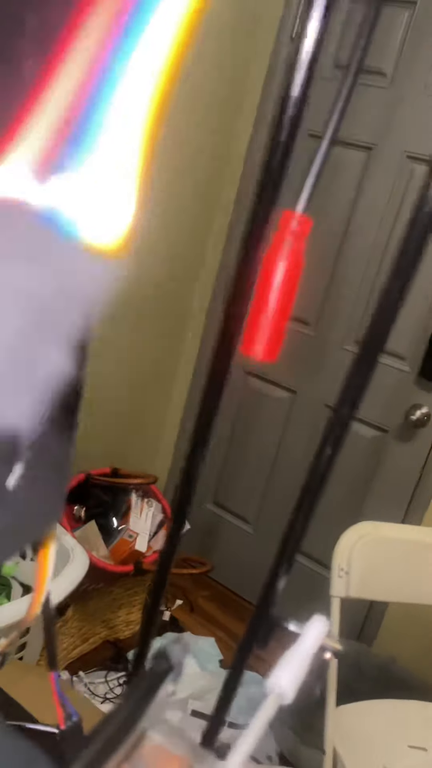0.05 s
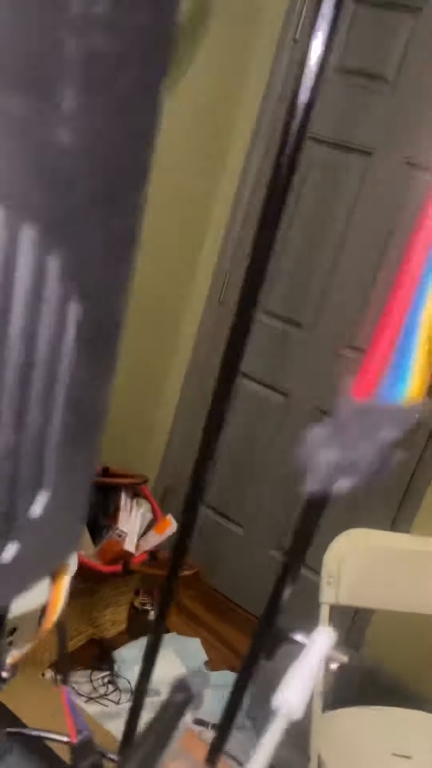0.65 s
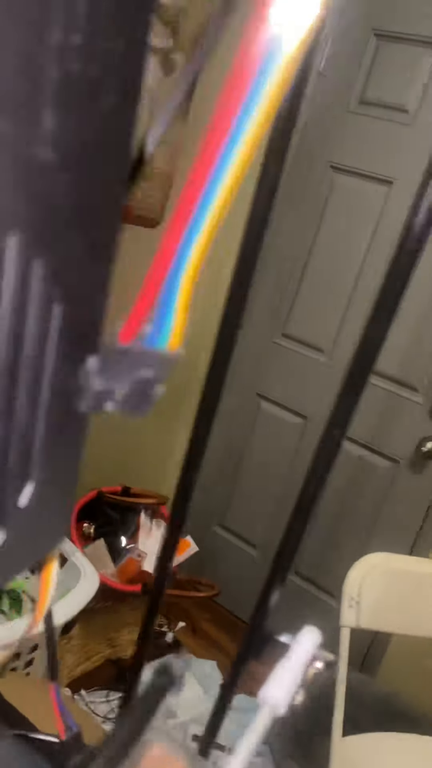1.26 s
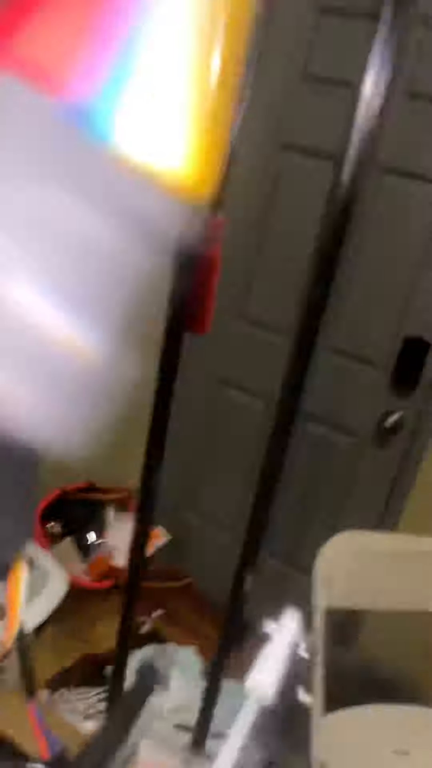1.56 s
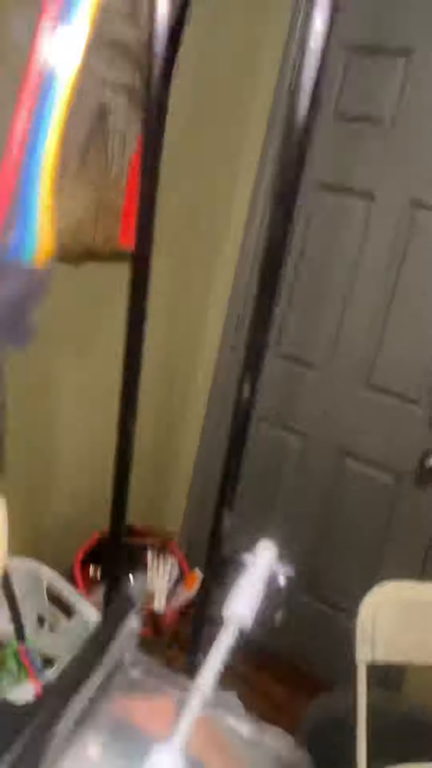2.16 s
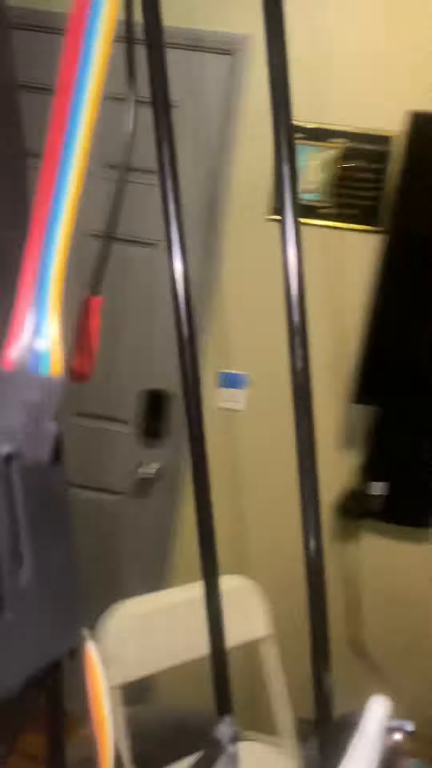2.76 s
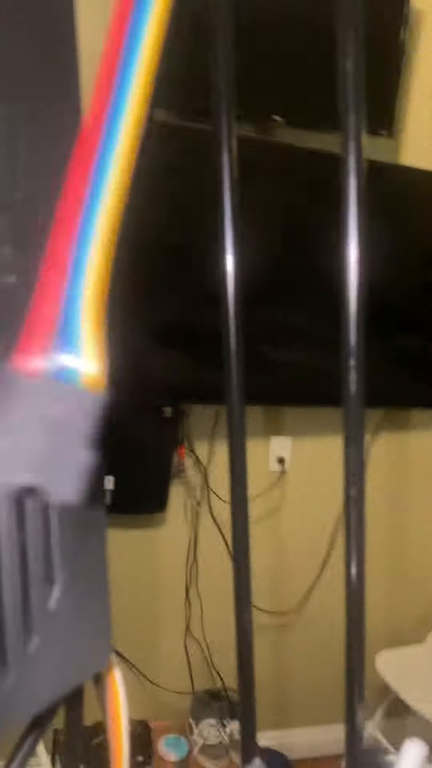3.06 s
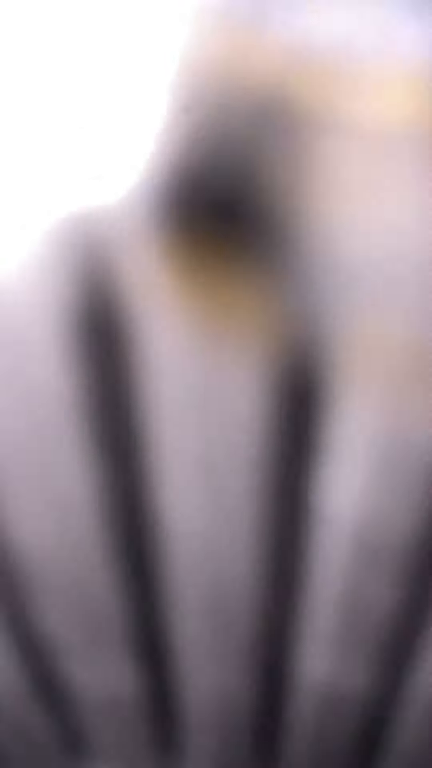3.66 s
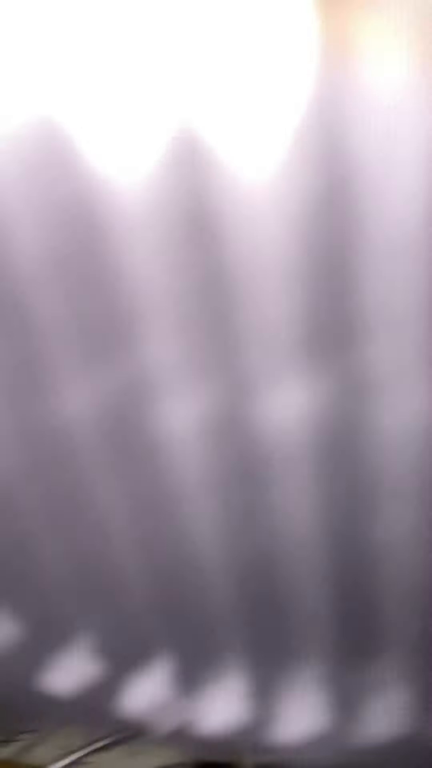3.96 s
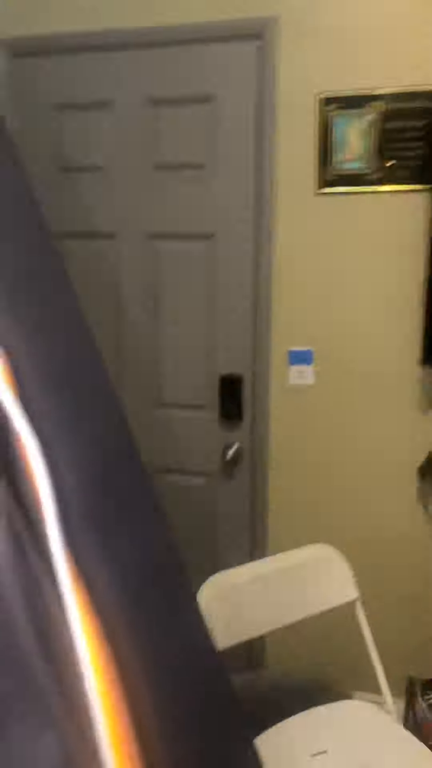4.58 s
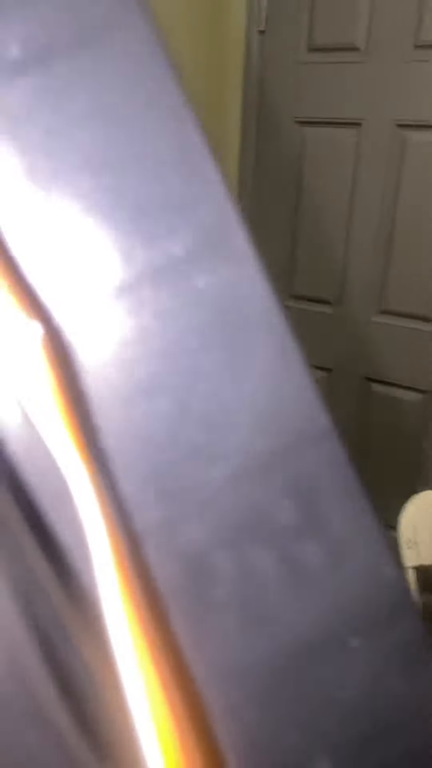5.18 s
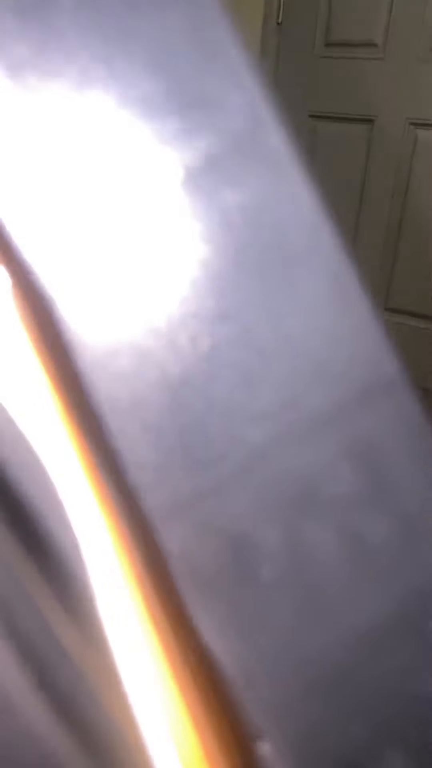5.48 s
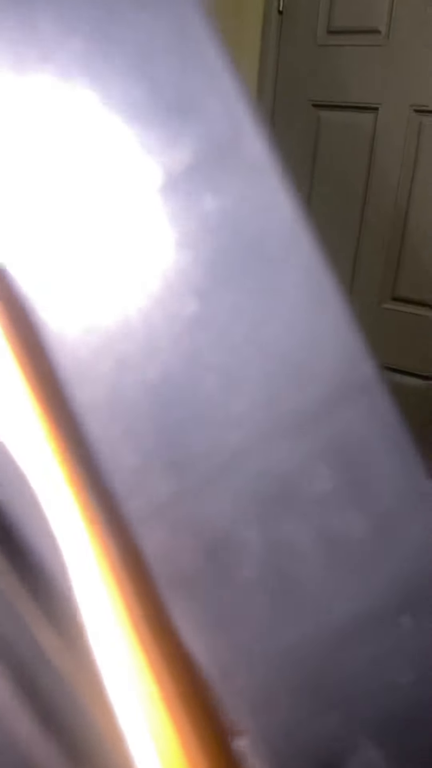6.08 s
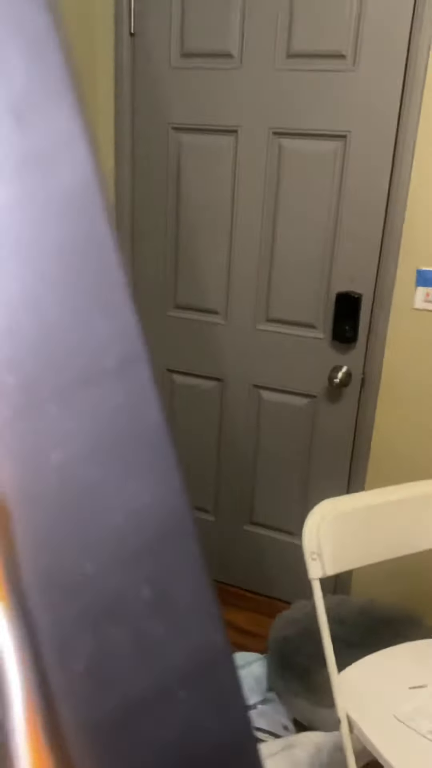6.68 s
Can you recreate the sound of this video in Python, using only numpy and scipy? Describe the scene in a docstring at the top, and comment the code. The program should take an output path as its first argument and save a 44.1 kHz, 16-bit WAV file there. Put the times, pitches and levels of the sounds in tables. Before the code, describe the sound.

Metal poles knock, scrape and clink amid rustling fabric in a small room, with heavy thumps on the microphone midway.

```python
"""Cloth rustles and metal poles knock, scrape and clink as someone shifts a fabric-covered frame
in a small room, right next to a phone; heavy bumps on its microphone thump and boom. Each impact
excites damped resonances of the tubes, the frame and the room, stick-slip friction drives the
scrapes, and the rustle is the sum of many tiny slips of fabric. The walls add a short tail."""
import sys
import numpy as np
from scipy import signal
from scipy.fft import rfft, irfft, next_fast_len
from scipy.io import wavfile

SR = 44100
rng = np.random.default_rng(int(sys.argv[2]) if len(sys.argv) > 2 else 0)


def unload_wav(signal):
    """Save mono or channel-first audio to the path in sys.argv[1] as 16-bit WAV at rate SR, clipped to [-1, 1]."""
    wavfile.write(
        sys.argv[1],
        SR,
        np.round(np.clip(np.atleast_2d(signal).T, -1, 1) * 32767).astype(np.int16),
    )


N = 305749

# pole impacts, each with two hollow resonances:
# start_s, level_db, hardness_db, lower_hz, upper_hz, t60_s, tilt_db_per_octave
KNOCKS = [(0.249, -47, -6.5, 747, 1537, 0.088, 2.5), (0.393, -40, -2.5, 919, 3340, 0.13, -12),
          (0.543, -29, 4.5, 900, 1500, 0.05, -15), (0.858, -45, -4.5, 770, 1470, .08, -0.5),
          (.982, -33.5, -14.5, 787, 900, 0.06, 0), (1.035, -42, 7.5, 790, 2960, 0.083, 11),
          (1.182, -29, 0, 900, 1646, 0.046, -11), (1.353, -16.5, 0, 924, 2054, 0.059, -1.5),
          (1.442, -19.5, 3, 893, 2078, 0.089, 2), (1.68, -28.5, -12, 800, 886, 0.048, -2),
          (1.743, -28.5, 9, 1897, 2277, .065, 1), (2.128, -38.5, 1.5, 1810, 2706, 0.075, 2.5),
          (2.248, -38, -9.5, 800, 900, 0.042, -9), (2.491, -48.5, 1.5, 906, 1930, 0.063, -11),
          (2.593, -45, 15, 1625, 2700, 0.049, 5), (2.754, -47.5, -0.5, 1390, 2950, 0.048, 11),
          (2.803, -41.5, 19, 1900, 3000, .065, -2), (2.865, -38.5, 0, 805, 1687, 0.1, -18),
          (3.255, -47.5, 9.5, 1500, 1890, 0.11, -4), (3.561, -39, 7.5, 1500, 1870, 0.036, 1.5),
          (3.606, -18, -1, 990, 1320, 0.035, -5.5), (3.999, -41, -3, 1156, 1300, 0.046, 11.5),
          (4.158, -36, 7, 1123, 3635, 0.12, 8.5), (4.492, -44.5, 0.5, 1480, 2785, 0.05, 0),
          (4.55, -44.5, 19.5, 900, 1804, 0.052, 4), (5.037, -33.5, 0.5, 1047, 2300, 0.1, 2),
          (5.174, -49, 1, 855, 2300, 0.06, -10), (5.609, -30, -8.5, 900, 1423, .06, -6),
          (6.775, -29, -7.5, 900, 2900, 0.065, 13)]
# spectrum of a contact: frequency_hz, density_db
CONTACT_SPECTRUM = [(25, -30), (55, -0.5), (120, 4), (220, -4), (330, -0.5), (520, -3), (700, -3.5),
                    (1200, 2.5), (2400, -2), (4000, -7), (6000, -16), (9000, -37), (12000, -65.5)]
# the thud, body, crack and tick bands: low_hz, high_hz
BANDS = [(35, 200), (200, 700), (700, 2800), (2800, 11000)]
# stereo width and reverberation of each band: side_db, room_db, room_t60_s
BAND_SPACE = [(-12, -12, 1), (-10, -9.5, 0.3), (-5, -7.5, 0.14), (-0.5, -9, 0.26)]
# the shifting grip decides where the frame sounds strongest: time_s, centre_hz
GRIP = [(0, 407), (3.3, 439), (4.0, 291), (5.05, 512), (5.6, 375), (6.8, 330)]


def undb(db):
    """Decibels to amplitude ratio."""
    return 10 ** (np.asarray(db) / 20)


def unit(x):
    """Normalise to rms 1."""
    return x / np.sqrt(np.mean(x ** 2))


def clock(seconds):
    """Time axis in seconds."""
    return np.arange(int(seconds * SR)) / SR


def fade(t, t60):
    """Exponential decay of 60 dB in t60 seconds."""
    return np.exp(-np.log(1000) * t / t60)


def onset(t, rise_s):
    """Exponential approach to full amplitude."""
    return 1 - np.exp(-t / rise_s)


def peak(hz, centre_hz, octaves):
    """Resonance peak of height 1, Gaussian in log frequency."""
    return np.exp(-(np.log2(hz / centre_hz) / octaves) ** 2)


def add(out, start_s, x):
    """Superpose a sound at a given time."""
    i = max(int(start_s * SR), 0)
    out[:, i:i + x.shape[1]] += x[:, :N - i]


def band(x, edges_hz, order=3):
    """Causal band-pass filter."""
    return signal.sosfilt(signal.butter(order, edges_hz, "band", fs=SR, output="sos"), x)


def spectrum_db(points, at_hz):
    """Interpolate (frequency_hz, density_db) points over log frequency."""
    hz, db = np.transpose(points)
    return np.interp(np.log(at_hz), np.log(hz), db)


def noise(points, size):
    """White noise shaped to a spectrum; rms 1."""
    n = next_fast_len(size)
    hz = np.maximum(np.fft.rfftfreq(n, 1 / SR), 1)
    shaped = rfft(rng.standard_normal(n)) * undb(spectrum_db(points, hz))
    return unit(irfft(shaped, n)[:size])


def ring(modes, t, detune=0.0065):
    """Modal superposition: damped sines, randomly retuned for each blow."""
    chance = rng.standard_normal((len(modes), 2))
    return sum(undb(db) * fade(t, t60) * np.sin(2 * np.pi * (hz * (1 + detune * shift) * t + phase))
               for (hz, db, t60), (shift, phase) in zip(modes, chance))


def stereo(mid, side, side_db):
    """Left and right from two uncorrelated signals, conserving power."""
    width = undb(side_db)
    return np.array([mid + width * side, mid - width * side]) / np.sqrt(1 + width ** 2)


def focus(hz, centre_hz, hollow_hz):
    """The point of contact selects a low resonance and a hollow one; emphasis in dB."""
    return 6.0 * peak(hz, centre_hz, octaves=0.26) + 6.5 * peak(hz, hollow_hz, octaves=0.18)


def rattle(centre_hz, hollow_hz, size):
    """Modal overlap: countless weak resonances merge into coloured noise."""
    hz = np.geomspace(25, SR / 2, 160)
    return noise(np.c_[hz, spectrum_db(CONTACT_SPECTRUM, hz) + focus(hz, centre_hz, hollow_hz)], size)


def frame_and_room_ring(centre_hz, hollow_hz, t60, t):
    """Strong resonances of the frame and the small room, ringing after each contact."""
    # resonances of the frame and the room: frequency_hz, level_db, t60_ratio
    resonances = [(174, -13.5, 1.6), (291, -7.5, 2.1), (342.8, -7, 1.8), (374.3, -7.5, 1.3),
                  (418.3, -1.5, 1.7), (501, -2.5, 1.8), (551, -6, 1.6), (620.6, -9, 1.1), (818, -5, 1.3),
                  (924, 0, .9), (992, -7, .9), (1095, -10.5, 2.4), (1240, -8, .9), (1380, -2.5, 1.1),
                  (1625, -8.5, 1.4), (1810, -10.5, 1.0), (2177, -5.5, 1.1), (2660, -9, 1.1),
                  (2876, -10.5, 1.3), (3890, -13, 1.1)]
    damped_t60 = min(t60, .075)
    modes = [(hz, db + focus(hz, centre_hz, hollow_hz), damped_t60 * ratio)
             for hz, db, ratio in resonances]
    return ring(modes, t, detune=.016)


def hollow(hollow_hz, t60, t):
    """A hollow section clacks in a tight cluster of modes; a high cluster is damped faster."""
    cluster = [(.89, -7), (.95, -2), (1, 1), (1.05, -2), (1.12, -7)]  # frequency_ratio, level_db
    cluster_t60 = t60 * min(2300 / hollow_hz, 1)
    return ring([(hollow_hz * ratio, db, cluster_t60) for ratio, db in cluster], t)


def friction(slips, centre_hz, hollow_hz, slip_t60, ring_t60):
    """Impulse response: each slip releases a noise burst and rings frame, room and tube; rms 1."""
    t, size = clock(.2), len(slips)
    swell = onset(t, .0015)
    envelope = signal.fftconvolve(np.abs(slips), swell * fade(t, slip_t60))[:size]
    bursts = rattle(centre_hz, hollow_hz, size) * envelope
    modes = frame_and_room_ring(centre_hz, hollow_hz, ring_t60, t)
    modes += undb(1) * hollow(hollow_hz, ring_t60 / 2, t)
    hum = signal.fftconvolve(slips, swell * modes)[:size]
    return unit(unit(bursts) + unit(hum))


def crackle(rate_hz, spread_db, t60):
    """Shot-noise envelope: fibres and folds let go at random in overlapping, unequal grains."""
    t = clock(.05)
    sizes = undb(spread_db * np.minimum(rng.exponential(size=N), 4))
    grains = (rng.random(N) < rate_hz / SR) * sizes
    return signal.fftconvolve(grains, fade(t, t60) * onset(t, .002))[:N]


def contact_levels(db, hardness_db, share_db, cushioning=0.68):
    """Band levels in dB: a harder contact is shorter, so its energy lies higher in frequency."""
    # change in thud, body, crack and tick: db_per_hardness_db
    hardening = [-0.11, -0.48, 0.52, 0.53]
    cushion_db = np.array([0, 0, 0, cushioning * min(hardness_db, 0)])  # cloth absorbs the tick
    return db + np.array(share_db) + hardness_db * np.array(hardening) + cushion_db


def voice(pair, levels_db, window_s):
    """Spectral balance: set each band of a mid and side pair by its rms over the opening window."""
    out = 0
    for edges, db, (side_db, _, _) in zip(BANDS, levels_db, BAND_SPACE):
        part = band(pair, edges)
        rms = np.sqrt(np.mean(part[:, :int(window_s * SR)] ** 2, axis=1, keepdims=True))
        out = out + undb(db) * stereo(*(part / rms), side_db)
    return out


def still_air():
    """Ambient noise: the faint, steady, mostly low sound of the room's air."""
    # spectrum of the air: frequency_hz, density_db
    spectrum = [(25, -9.5), (100, 1), (400, -8), (1000, -28.5), (4000, -33), (8000, -39), (13000, -55.5)]
    return undb(-67.5) * stereo(noise(spectrum, N), noise(spectrum, N), side_db=-10.5)


def cloth_motion(t, shake_swish_db=-19, shake_crinkle_db=-25.5, settle_t60=0.3):
    """Incoherent powers add: the hands' pull plus each knock's shake, as swish and crinkle dB."""
    # cloth drawn along with the frame: time_s, swish_db, crinkle_db
    pulls = [(0, -54, -65), (0.801, -64, -66), (1.04, -41, -52), (1.27, -43.5, -53.5), (1.449, -32.5, -37),
             (1.72, -38.5, -54.5), (1.99, -59.5, -66.5), (2.085, -35.5, -44), (2.34, -49.5, -62.5),
             (3.071, -49, -61), (3.501, -57, -64), (3.78, -48.5, -60), (4.07, -47, -62), (4.36, -61, -80.5),
             (4.461, -47.5, -55), (4.61, -52.5, -56), (4.92, -75.5, -72.5), (5.13, -56.5, -53.5),
             (5.301, -70.5, -74), (5.67, -60, -77), (5.98, -80, -84.5), (6.27, -53.5, -74.5),
             (6.72, -62.5, -72.5), (6.93, -45, -55.5)]
    times, swish_db, crinkle_db = np.transpose(pulls)
    shake_power, after = np.zeros((1, N)), clock(.6)
    for start, db, *_ in KNOCKS:
        shake = undb(db) * onset(after, 0.022) * fade(after, settle_t60)
        add(shake_power, start, shake[None] ** 2)
    return [10 * np.log10(undb(np.interp(t, times, pull_db)) ** 2 + undb(shake_db) ** 2 * shake_power[0])
            for pull_db, shake_db in [(swish_db, shake_swish_db), (crinkle_db, shake_crinkle_db)]]


def flutter(t, depth_db=4.0, rate_hz=32.0):
    """Random amplitude modulation, in dB, as folds come and go."""
    steps = np.arange(0, t[-1] + 1, 1 / rate_hz)
    return depth_db * np.interp(t, steps, rng.standard_normal(len(steps)))


def swishing(t, slip_rate_hz=2200, grip_db=6.0):
    """Forced vibration: sliding folds drive low resonances, most of all near the grip's; rms 1."""
    # low resonances that sliding cloth excites: frequency_hz
    resonances = [304, 395, 540]
    sizes = undb(0.5 * np.minimum(rng.exponential(size=N), 5))
    slips = (rng.random(N) < slip_rate_hz / SR) * sizes * rng.choice([-1, 1], N)
    grip_hz, out = np.interp(t, *np.transpose(GRIP)), 0
    for hz in resonances:
        pair = np.array([friction(slips, hz, hollow_hz=800.0, slip_t60=0.0073, ring_t60=0.024)
                         for _ in range(2)])
        out = out + pair * undb(grip_db * peak(hz, grip_hz, octaves=0.36) + flutter(t))
    return unit(band(out, BANDS[1]) + undb(1) * band(out, BANDS[0]))


def cloth():
    """Friction noise of sliding folds: a structure-borne swish and a fine airborne crinkle."""
    t = np.arange(N) / SR
    swish_db, crinkle_db = cloth_motion(t)
    swish = swishing(t)
    grains = crackle(rate_hz=1500.0, spread_db=1.8, t60=.022)
    fibres = grains * np.array([noise(CONTACT_SPECTRUM, N) for _ in range(2)])
    crinkle = unit(band(fibres, (900, 7100), order=2))
    # broad and fine folds flutter independently, so the colour keeps shifting
    crinkle = unit(sum(band(crinkle, edges) * undb(flutter(t)) for edges in BANDS[2:]))
    return (stereo(*swish, side_db=-7.0) * undb(swish_db + flutter(t) / 2)
            + stereo(*crinkle, side_db=0.5) * undb(crinkle_db - 0.5 + flutter(t)))


def taps(t60=0.03, rise_s=0.002, gain_db=-1.5):
    """Heavy damping: light touches and buckling folds leave only a brief, hollow burst."""
    # taps and creases: start_s, relative_level_db, hardness_db, hollow_hz
    touches = [(0.02, -53, -11.5, 700), (0.123, -52, -13, 725), (0.329, -45, -12.5, 1020),
               (0.655, -52, -1, 1620), (1.169, -41.5, -1, 3400), (1.422, -37.5, 13, 5240),
               (2.374, -39.5, -8, 1390), (3.529, -25, -4.5, 1530), (3.574, -33.5, 15, 5600),
               (3.687, -40.5, 11, 4200), (3.693, -49, 12, 4400), (3.742, -55, 10, 4460),
               (3.968, -44, -8.5, 1240), (4.734, -50, 5, 1800), (4.943, -41, 9, 900),
               (4.999, -64.5, 18, 5000), (5.072, -47.5, 16.5, 3900), (6.306, -64, 10, 3900),
               (6.86, -47, 8, 4600)]
    # band balance of a tap: thud_db, body_db, crack_db, tick_db
    share_db = [-16, -1, 0.76, -8.5]
    out, t = np.zeros((2, N)), clock(.1)
    for start, db, hardness_db, hollow_hz in touches:
        pair = np.array([rattle(hollow_hz, hollow_hz, len(t)) for _ in range(2)])
        pair *= fade(t, t60) * onset(t, rise_s)
        add(out, start, voice(pair, contact_levels(db, hardness_db, share_db), window_s=.01))
    return undb(gain_db) * out


def nudges(t60=0.14, rise_s=.0015):
    """Structure-borne sound: a jog of the hand reaches the phone through the grip as a dull thump."""
    # jogs of the frame: start_s, level_db
    jogs = [(0.02, -47), (0.124, -48), (0.249, -48.5), (0.397, -40.5), (1.352, -28), (1.613, -36),
            (2.87, -47), (3.567, -22), (3.971, -44.5)]
    out, t = np.zeros((2, N)), clock(.3)
    for start, db in jogs:
        pair = np.array([band(noise(CONTACT_SPECTRUM, len(t)), BANDS[0]) for _ in range(2)])
        pair *= fade(t, t60) * onset(t, rise_s)
        pair /= np.std(pair[:, t < .03], axis=1, keepdims=True)
        add(out, start, undb(db) * stereo(*pair, side_db=-8.0))
    return out


def chatter(x, gap_s=.005, restitution=.55):
    """Inelastic rebound: a loose joint bounces three times, unevenly, thickening the low ring."""
    delays = np.cumsum(gap_s * np.exp(.4 * rng.standard_normal(3)))
    soft = band(x, BANDS[1])
    return x + sum(restitution ** bounce * np.pad(soft, (int(delay * SR), 0))[:len(x)]
                   for bounce, delay in enumerate(delays, 1))


def blow(centre_hz, lower_hz, upper_hz, t60, rise_s):
    """Impact excitation: a sharp-edged rattle, a hollow two-note clack and a chattering ring."""
    t = clock(.6)
    burst = rattle(centre_hz, upper_hz, len(t)) * (fade(t, t60) + undb(5.5) * fade(t, 0.018))
    # the fabric absorbs a low clack; a high one stands clear
    clack = sum(undb(db) * min(hz / 1400, 1) * hollow(hz, t60, t)
                for hz, db in [(lower_hz, -1.0), (upper_hz, -1.5)])
    body = undb(-5) * chatter(frame_and_room_ring(centre_hz, lower_hz, t60, t))
    return (burst + clack + body) * onset(t, rise_s)


def disperse(x, delay_at_1khz_s=.001):
    """Dispersion: high bending waves travel faster, so the tick arrives before the thud."""
    hz = np.fft.rfftfreq(x.shape[-1], 1 / SR)
    phase = 4 * np.pi * delay_at_1khz_s * np.sqrt(1000 * hz)
    return irfft(rfft(x) * np.exp(-1j * phase), x.shape[-1])


def tilt_treble(x, db_per_octave, corner_hz=3500.0):
    """Spectral tilt: cloth between the poles absorbs treble, bare metal lifts it."""
    hz = np.fft.rfftfreq(x.shape[-1], 1 / SR)
    octaves = np.log2(np.maximum(hz / corner_hz, 1))
    return irfft(rfft(x) * undb(db_per_octave * np.minimum(octaves, 1.5)), x.shape[-1])


def knocks():
    """Impacts between poles and fittings launch bending waves through the frame."""
    # band balance of a knock: thud_db, body_db, crack_db, tick_db
    share_db = [-20, 0, -0.74, -8]
    out = np.zeros((2, N))
    for start, db, hardness_db, lower_hz, upper_hz, t60, tilt in KNOCKS:
        centre_hz = np.interp(start, *np.transpose(GRIP))
        rise_s = 0.0014 + 0.1 * max(-hardness_db, 0)  # a cushioned knock swells more slowly
        pair = np.array([blow(centre_hz, lower_hz, upper_hz, t60, rise_s) for _ in range(2)])
        knock = voice(disperse(pair), contact_levels(db, hardness_db, share_db), window_s=.03)
        add(out, start, tilt_treble(knock, tilt))
    return out


def scrapes(slip_rate_hz=310.0, unevenness=.5, scatter_db=3.0, centre_hz=388.0, easing=0.67):
    """Stick-slip friction: a run of uneven jerks that ease off as the pole comes free."""
    # dragging poles: start_s, length_s, level_db, hardness_db, hollow_hz, extra_hiss_db
    drags = [(0.389, 0.056, -38, -9.5, 1018, 5), (0.995, 0.062, -36.5, -14.5, 800, 0.5),
             (1.461, 0.037, -27.5, -6.5, 1000, 7.5), (1.61, 0.087, -39.5, -10.5, 885, -1.5),
             (1.664, 0.065, -29, -6.5, 828, 3.5), (2.055, 0.06, -33.5, -3, 1110, 1),
             (2.141, 0.13, -45, -14, 875, 2), (2.408, 0.034, -48.5, -12, 890, 2),
             (4.481, 0.055, -47, -2, 2640, 4.5)]
    # band balance of a scrape: thud_db, body_db, crack_db, tick_db
    share_db = [-11.5, 0.2, -1.1, -7]
    out = np.zeros((2, N))
    for start, length, db, hardness_db, hollow_hz, hiss_db in drags:
        gap_chance, size_chance = rng.standard_normal((80, 2)).T
        times = np.cumsum(np.exp(unevenness * gap_chance)) / slip_rate_hz
        times -= times[0]
        sizes = undb(scatter_db * size_chance) * np.exp(-easing * times / length)
        inside = times < length
        slips = np.zeros(len(clock(length + .15)))
        slips[(times[inside] * SR).astype(int)] = sizes[inside]
        pair = np.array([friction(slips, centre_hz, hollow_hz, slip_t60=0.014, ring_t60=0.067)
                         for _ in range(2)])
        levels_db = contact_levels(db, hardness_db, share_db) + [0, 0, 0, hiss_db]
        add(out, start, voice(pair, levels_db, window_s=length))
    return out


def snaps(t60=0.013):
    """Sudden elastic release: a metal edge catches and lets go in a short, bright transient."""
    # edges letting go: start_s, level_db
    releases = [(1.036, -43), (1.049, -45), (1.442, -35.5), (1.462, -33.5), (3.53, -41.5), (3.593, -26.5),
                (6.775, -43)]
    # spectrum of a snap: frequency_hz, density_db
    spectrum = [(1500, -25), (7000, 0), (10500, -9), (14000, -42)]
    out, t = np.zeros((2, N)), clock(.06)
    for start, db in releases:
        burst = stereo(noise(spectrum, len(t)), noise(spectrum, len(t)), side_db=2)
        add(out, start, undb(db) * fade(t, t60) * burst)
    return out


def struck_modes(strikes, modes, length_s, rise_s, side_db):
    """Damped oscillation: each strike sets the same family of resonances ringing."""
    out, t = np.zeros((2, N)), clock(length_s)
    for start, db in strikes:
        add(out, start, undb(db) * onset(t, rise_s) * stereo(ring(modes, t), ring(modes, t), side_db))
    return out


def microphone_bumps():
    """Handling noise: heavy bumps on the microphone give a deep thump and a low, lingering ring."""
    # bumps on the phone's microphone: start_s, level_db
    bumps = [(1.366, -20.5), (3.57, -25), (3.613, -11.5), (3.684, -21)]
    # tones of the thump and its ring: frequency_hz, level_db, t60_s
    low_tones = [(52, -4, 0.36), (73, 4, 0.094), (102.5, -18.5, 1.1), (124, -6.5, 0.15)]
    return struck_modes(bumps, low_tones, length_s=1, rise_s=0.0014, side_db=-9.0)


def clinks(jangle_db=-6.5, jangle_t60=0.13, rise_s=.0025):
    """Beating: three bare tubes ring in closely tuned modes inside a dense jangle."""
    # metal touching metal: start_s, level_db, pitch_ratio
    touches = [(1.463, -21.5, 1.005), (2.084, -41, 0.76), (5.038, -39, 0.76), (6.776, -42, 0.65)]
    # tube modes at pitch_ratio 1: frequency_hz, level_db, t60_s
    tube_modes = [(5250, -9, .16), (5475, -2, .18), (5701, -4, .17), (6320, -6, .13), (6520, -3, .09),
                  (7590, -3, .12), (8480, -7, .1), (9566, -9, .11), (10300, -12, .11)]
    # spectrum of the dense high modes: frequency_hz, density_db
    jangle_spectrum = [(2000, -43), (4500, -11), (5500, 2), (7700, 0), (9500, -4), (10800, -9),
                       (11800, -45)]
    out, t = np.zeros((2, N)), clock(.4)
    for start, db, pitch_ratio in touches:
        modes = [(hz * pitch_ratio, mode_db, t60) for hz, mode_db, t60 in tube_modes]
        pair = []
        for _ in range(2):
            tubes = np.mean([ring(modes, t, detune=.014) for _ in range(3)], axis=0)
            jangle = undb(jangle_db) * noise(jangle_spectrum, len(t)) * fade(t, jangle_t60)
            pair.append(tubes + jangle)
        add(out, start, undb(db) * onset(t, rise_s) * stereo(*pair, side_db=2.5))
    return out


def rubbing(strokes, spectrum, rise_s, release_s, side_db, peak_db):
    """Sliding friction: grainy noise with one resonance, sustained while the surfaces move."""
    out = np.zeros((2, N))
    grains = crackle(rate_hz=900.0, spread_db=2.5, t60=.012)
    hz = np.geomspace(25, SR / 2, 160)
    for start, length, db, resonance_hz in strokes:
        t, i = clock(length + release_s), int(start * SR)
        shape_db = spectrum_db(spectrum, hz) + peak_db * peak(hz, resonance_hz, octaves=0.31)
        pair = [noise(np.c_[hz, shape_db], len(t)) * unit(grains[i:i + len(t)]) for _ in range(2)]
        pressure = onset(t, rise_s) * fade(np.maximum(t - length, 0), release_s)
        add(out, start, undb(db) * pressure * stereo(*pair, side_db))
    return out


def fabric_rubs():
    """Sliding friction of fabric over a pole gives short, soft hisses."""
    # strokes of fabric: start_s, length_s, level_db, resonance_hz
    strokes = [(2.402, 0.041, -56.5, 3500), (2.675, 0.038, -63, 1200), (2.985, 0.054, -50.5, 3300),
               (3.2, 0.047, -61.5, 2800), (6.05, 0.077, -73, 4100), (6.178, .02, -64, 2700),
               (6.24, .06, -64.5, 4100), (6.37, 0.1, -67, 2883)]
    # spectrum of a stroke: frequency_hz, density_db
    spectrum = [(200, -8), (1500, -0.5), (4200, -4), (8000, -26.5), (11000, -43)]
    return rubbing(strokes, spectrum, rise_s=.006, release_s=.06, side_db=-1.5, peak_db=6.5)


def phone_grazes():
    """Contact noise: the frame slides against the phone itself with a brief rasp."""
    # grazing contacts: start_s, length_s, level_db, resonance_hz
    strokes = [(3.574, 0.041, -26, 2370), (3.62, 0.046, -19, 1330), (3.668, .02, -30.5, 1160),
               (3.803, 0.099, -45.5, 1110)]
    # spectrum of a graze: frequency_hz, density_db
    spectrum = [(60, -12.5), (430, -4), (650, -11), (950, 3), (1900, -0.5), (3000, -11.5), (3700, -7.5),
                (5000, -17.5), (9000, -27), (11500, -62)]
    return rubbing(strokes, spectrum, rise_s=0.0035, release_s=.04, side_db=-4.0, peak_db=8.0)


def free_rings():
    """Light damping: a pole that the hands do not hold hums on after a knock."""
    # knocks that leave a pole free: start_s, level_db
    strikes = [(4.012, -37.5), (4.16, -44), (5.04, -36.5), (5.615, -37.5), (6.781, -38)]
    # lasting modes of a free pole: frequency_hz, level_db, t60_s
    pole_modes = [(286, -2, .45), (312, -4, .3), (1095, -27, .75)]
    return struck_modes(strikes, pole_modes, length_s=.8, rise_s=0.002, side_db=-16.5)


def room(x, first_wall_s=0.0029):
    """Reverberation: diffuse echoes build up after the nearest wall; the bass lasts longest."""
    t, tail = clock(.8), 0
    build_up = 1 - np.exp(-(t / first_wall_s) ** 2)
    for edges, (side_db, db, t60) in zip(BANDS, BAND_SPACE):
        echoes = band(rng.standard_normal((2, len(t))), edges) * fade(t, t60) * build_up
        bandwidth_share = (edges[1] - edges[0]) / (SR / 2)
        tail = tail + undb(db) * stereo(*unit(echoes), side_db / 2) * np.sqrt(bandwidth_share / len(t))
    return signal.fftconvolve(x, tail, axes=1)[:, :N]


def scene():
    """Direct plus reverberant sound; near sources stay almost dry, microphone bumps wholly so."""
    rubs, grazes = fabric_rubs(), phone_grazes()
    frame = knocks() + free_rings() + nudges() + scrapes() + cloth() + rubs + clinks()
    near = taps() + snaps() + grazes
    return still_air() + frame + near + microphone_bumps() + room(frame + undb(-8.5) * near)


def record(dry, rumble_hz=43.0, ceiling=.88, top_hz=15800):
    """Band limiting: the phone cuts the rumble and the top; the loudest peaks are softly rounded."""
    dry = signal.sosfilt(signal.butter(3, rumble_hz, "high", fs=SR, output="sos"), dry)
    rounded = dry / (1 + (dry / ceiling) ** 6) ** (1 / 6)
    return signal.sosfilt(signal.ellip(8, .2, 60, top_hz, fs=SR, output="sos"), rounded)


dry = scene()
out = record(dry)
unload_wav(out)
```